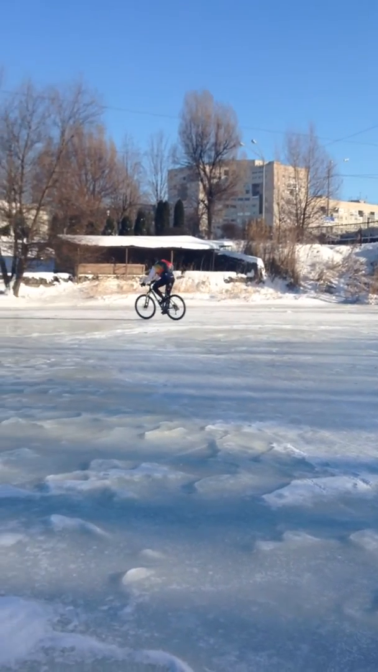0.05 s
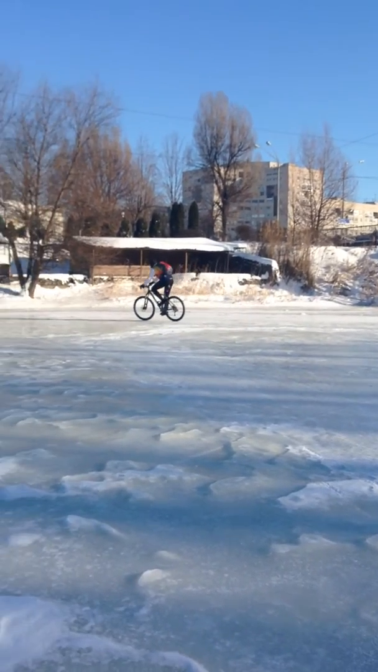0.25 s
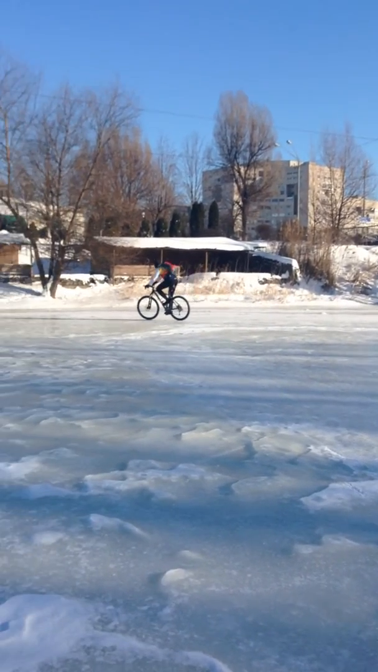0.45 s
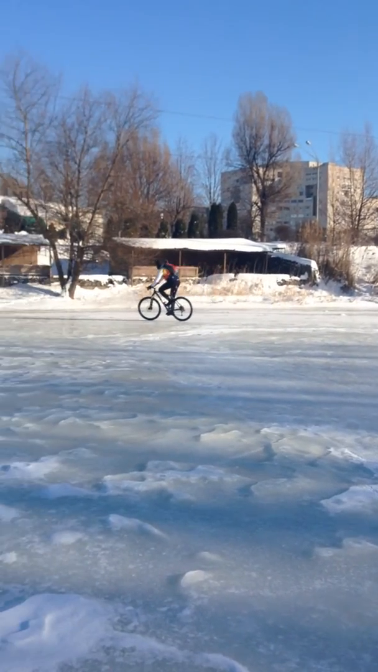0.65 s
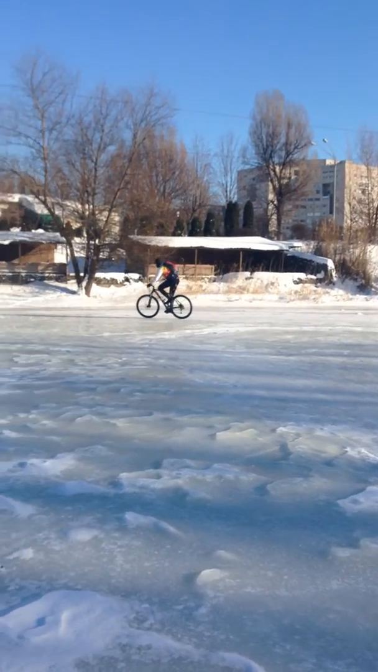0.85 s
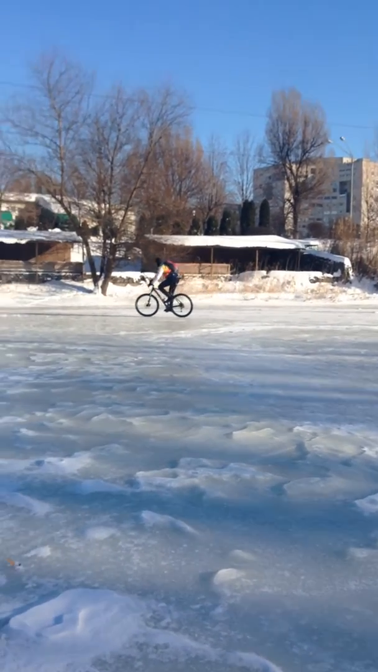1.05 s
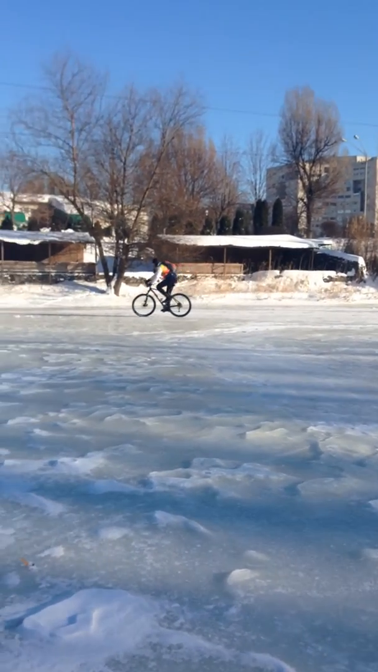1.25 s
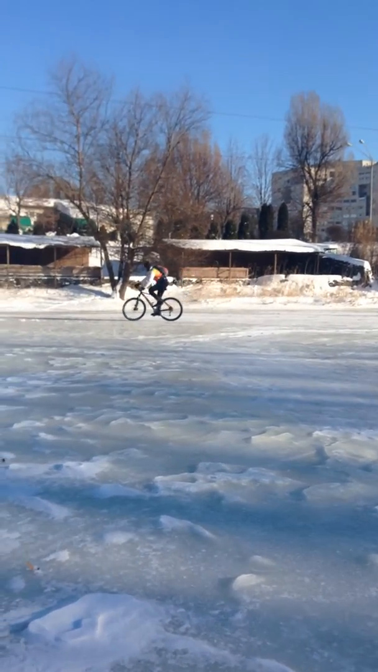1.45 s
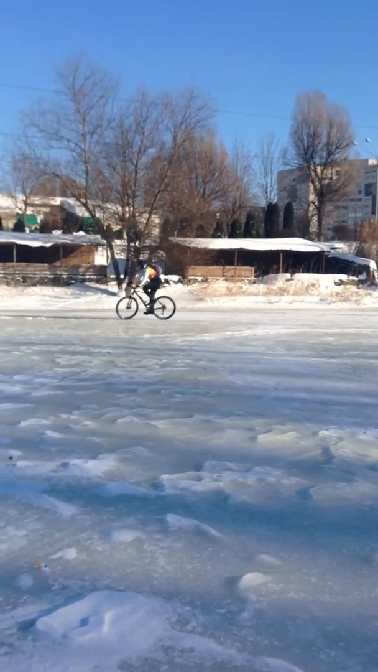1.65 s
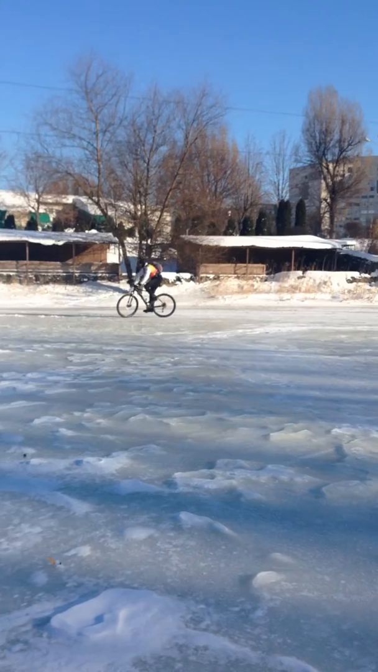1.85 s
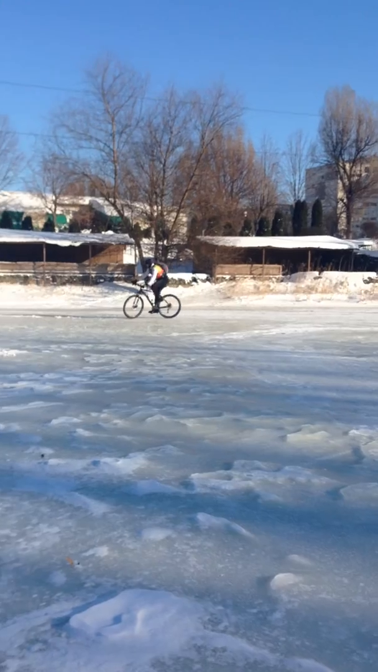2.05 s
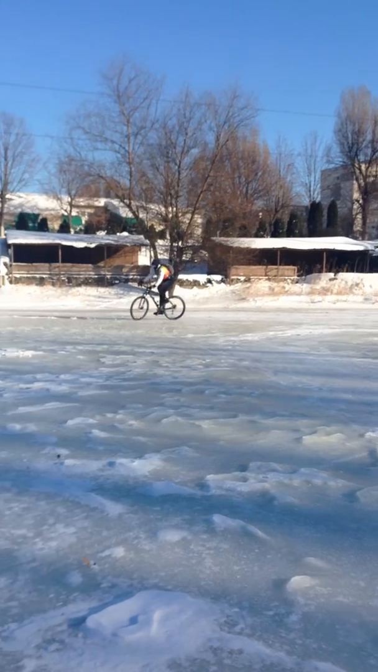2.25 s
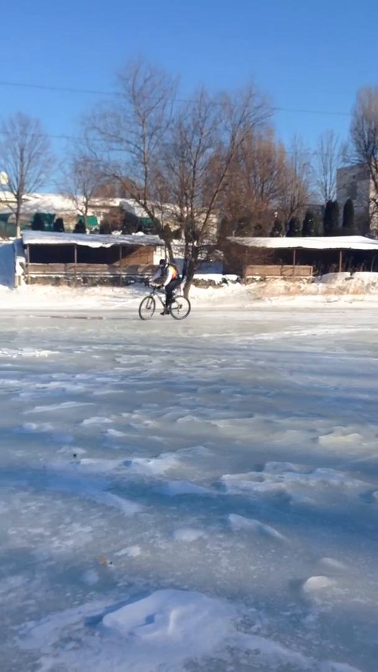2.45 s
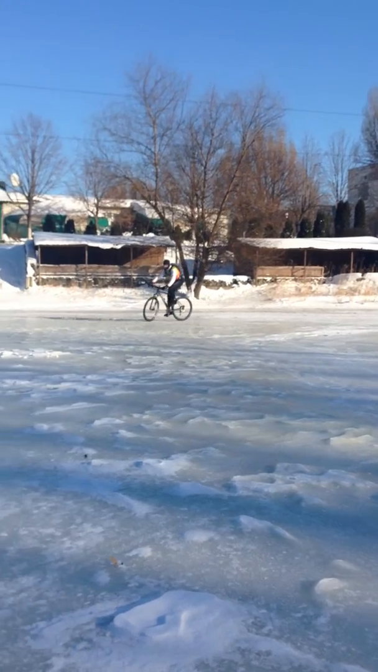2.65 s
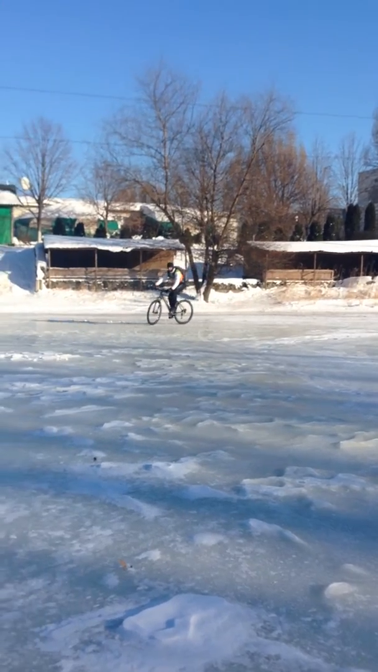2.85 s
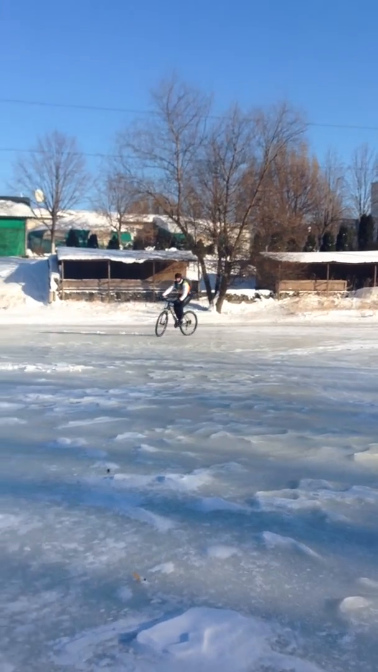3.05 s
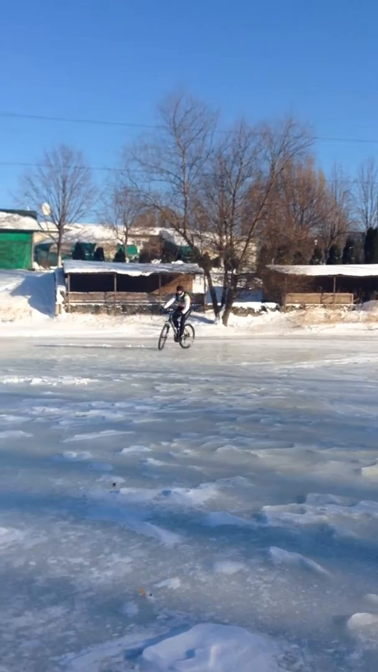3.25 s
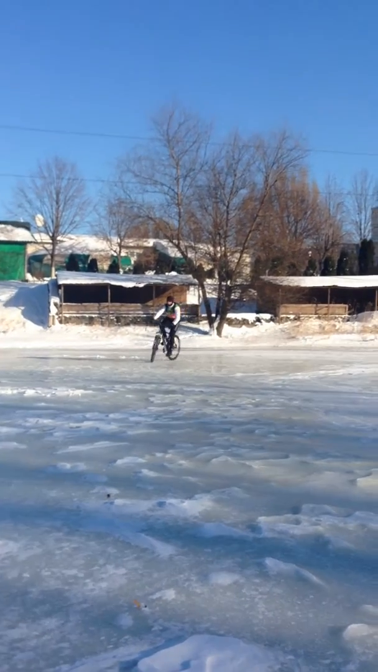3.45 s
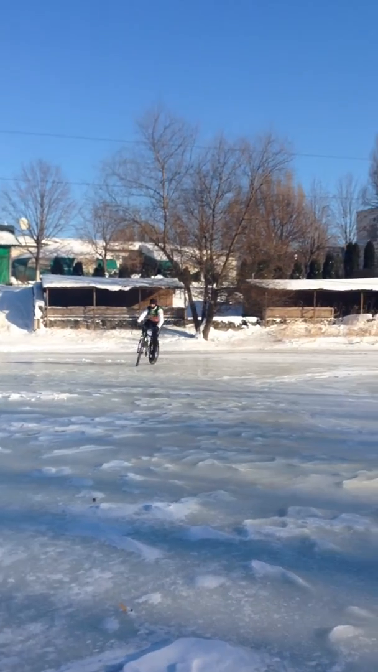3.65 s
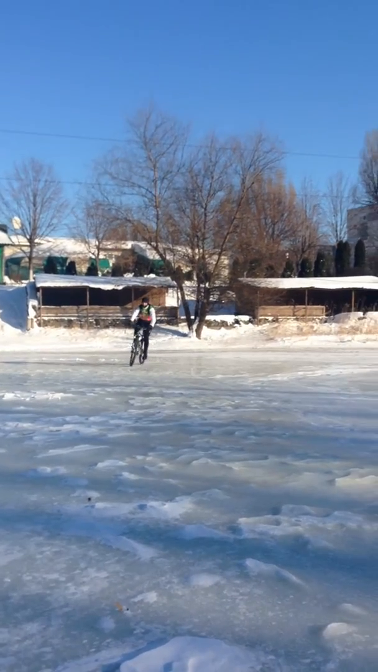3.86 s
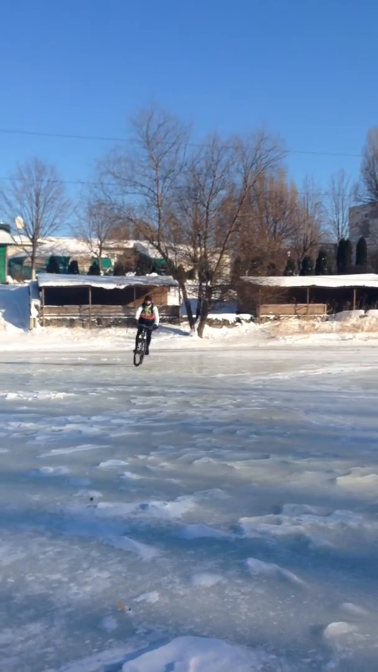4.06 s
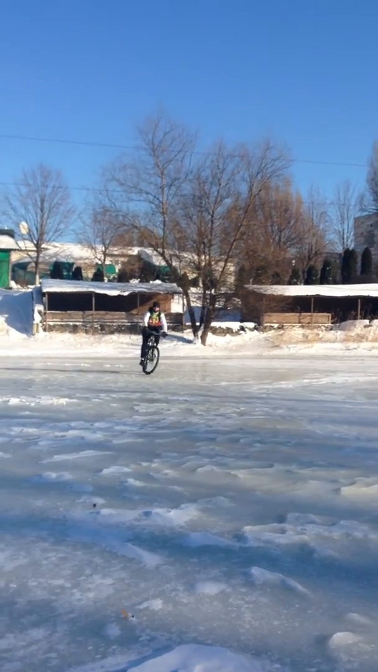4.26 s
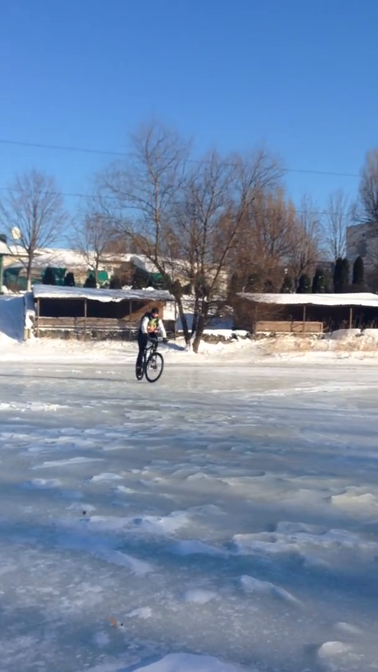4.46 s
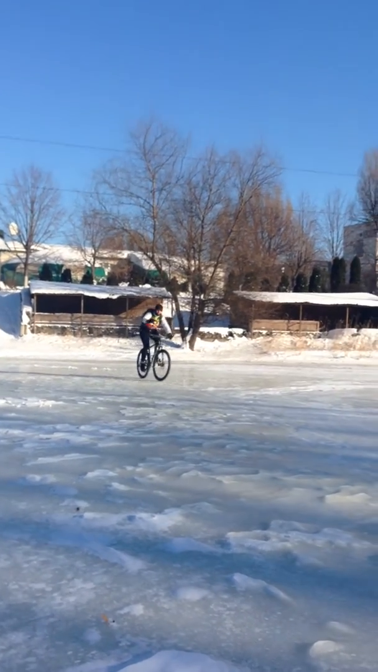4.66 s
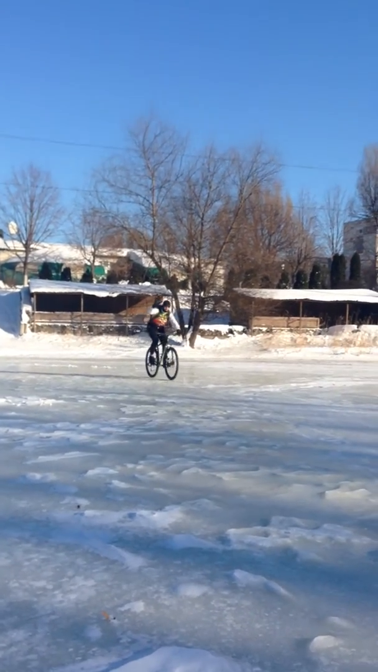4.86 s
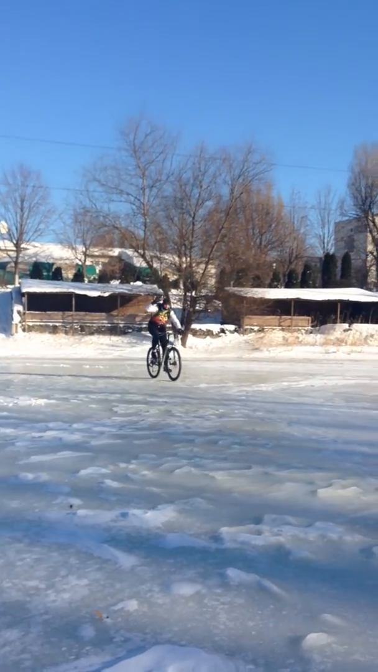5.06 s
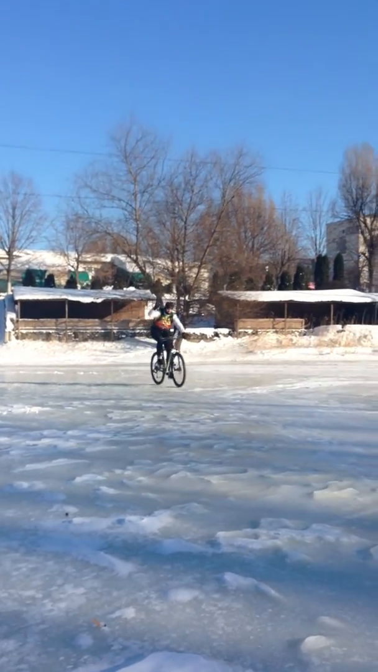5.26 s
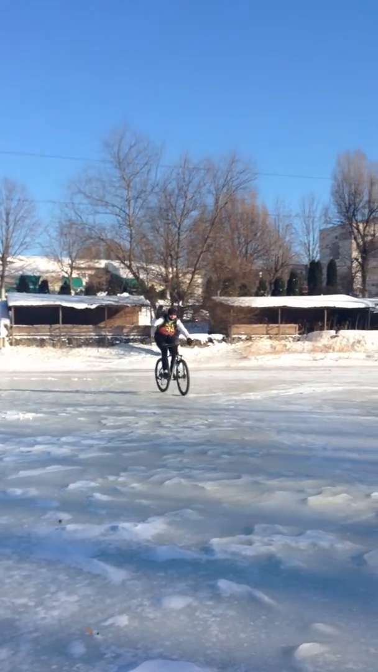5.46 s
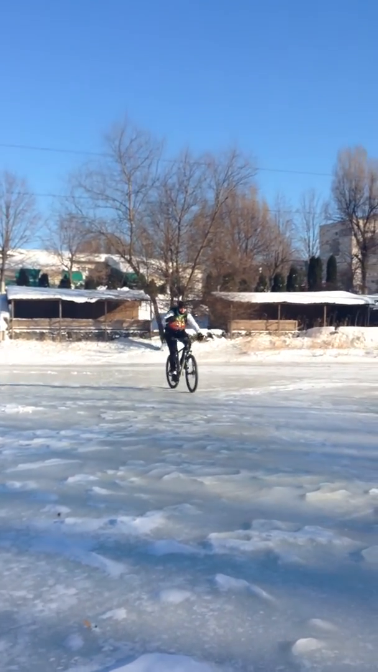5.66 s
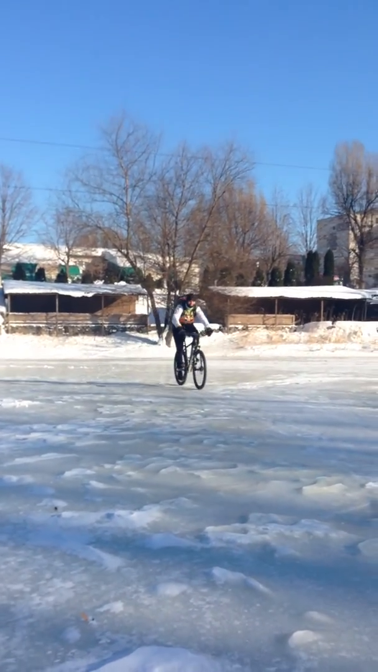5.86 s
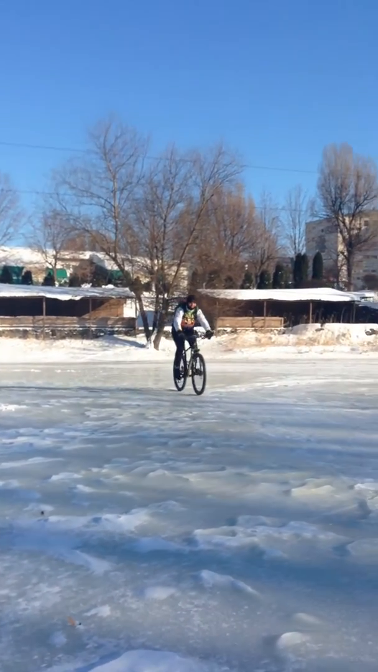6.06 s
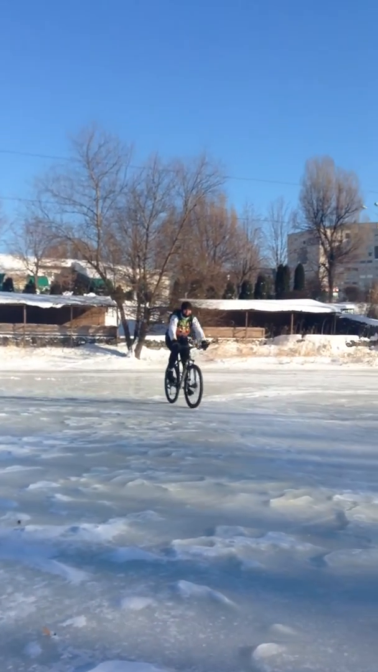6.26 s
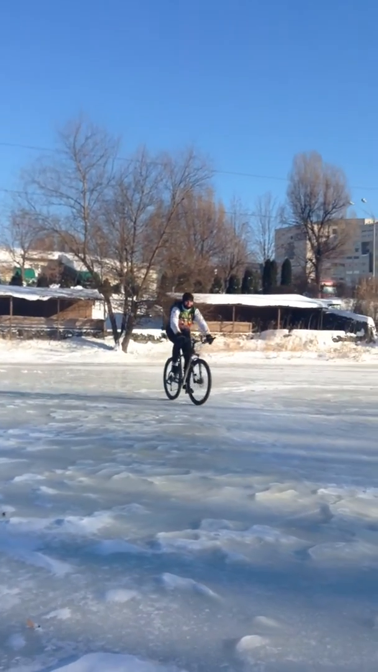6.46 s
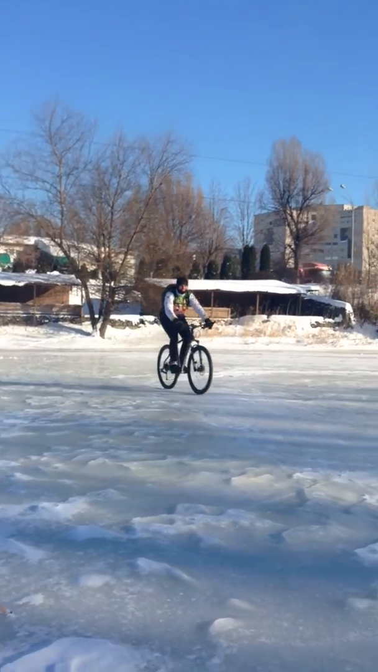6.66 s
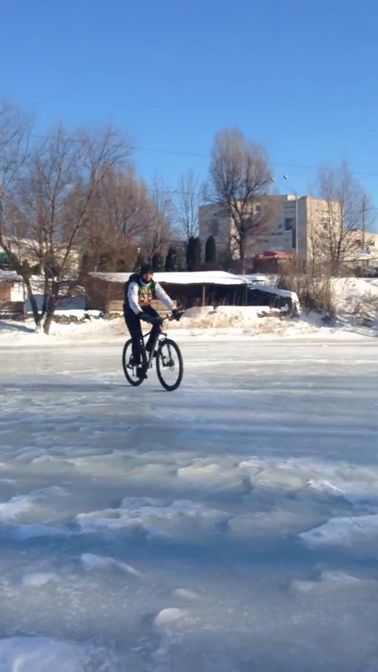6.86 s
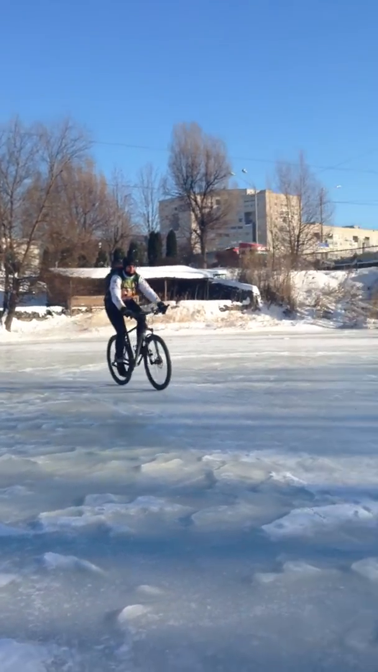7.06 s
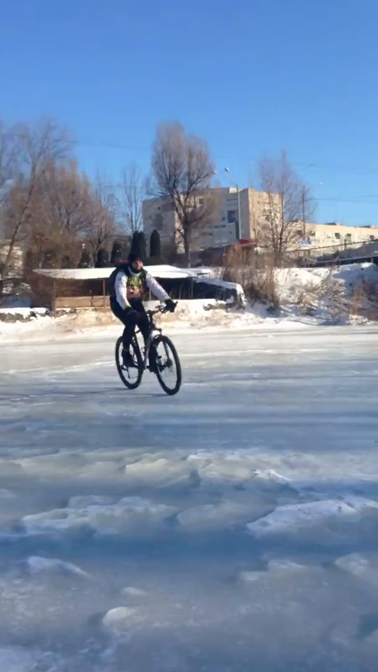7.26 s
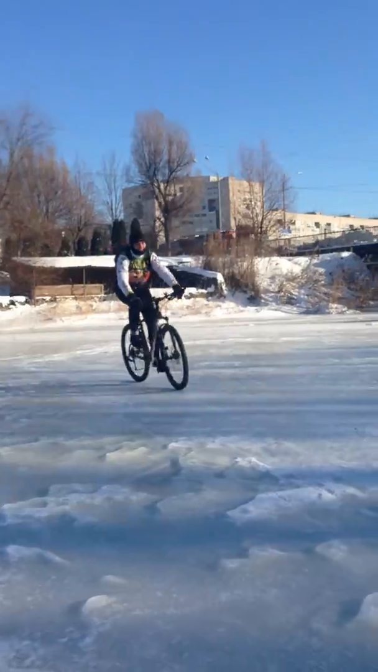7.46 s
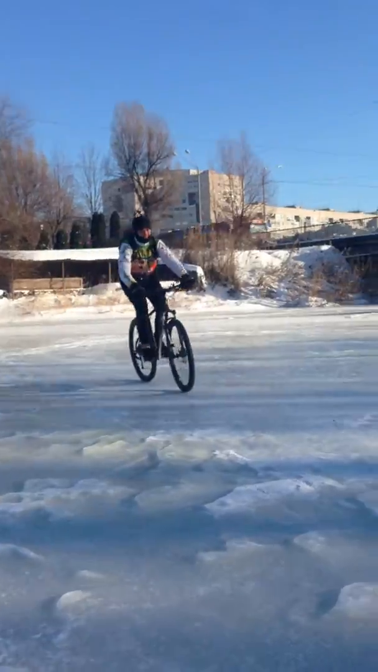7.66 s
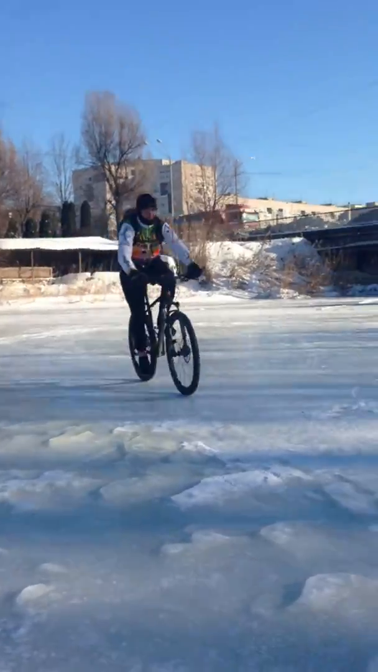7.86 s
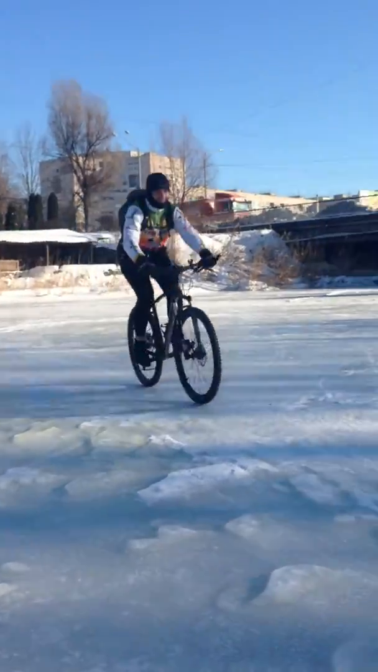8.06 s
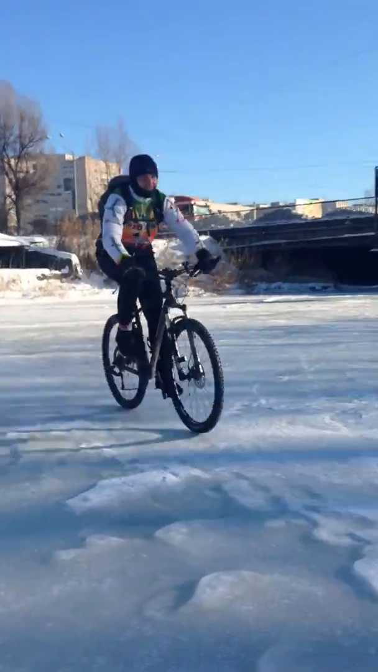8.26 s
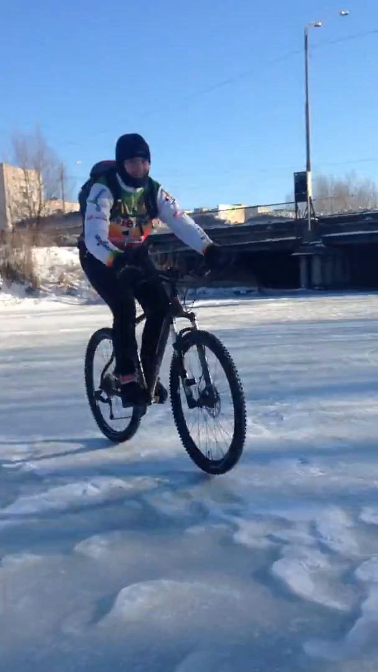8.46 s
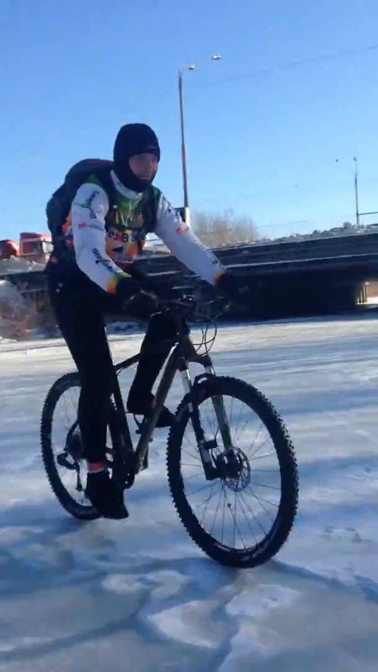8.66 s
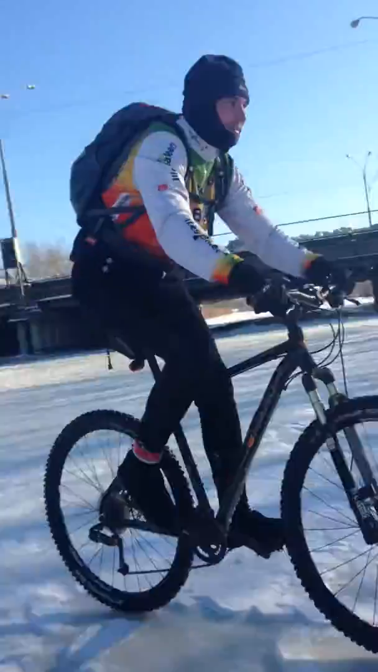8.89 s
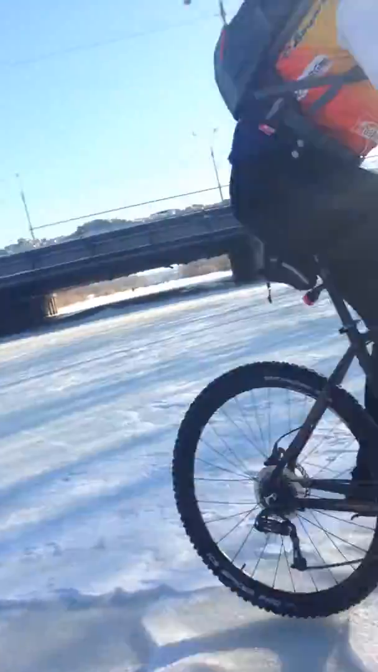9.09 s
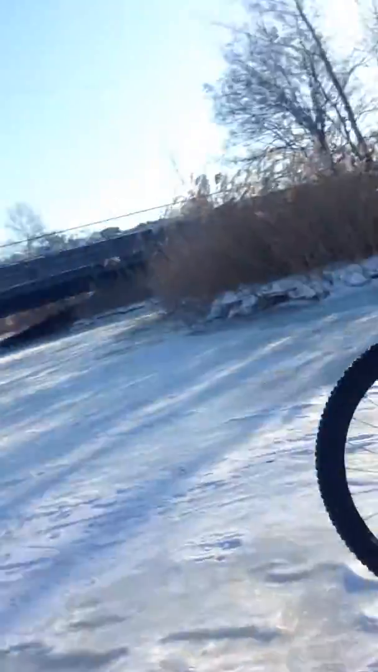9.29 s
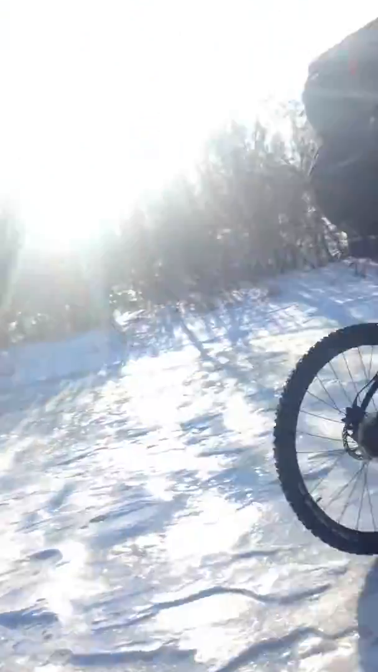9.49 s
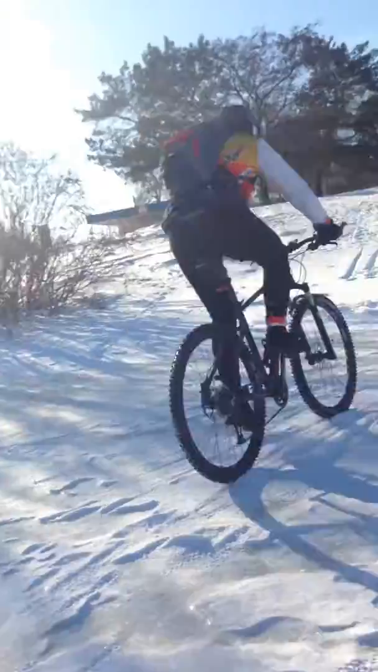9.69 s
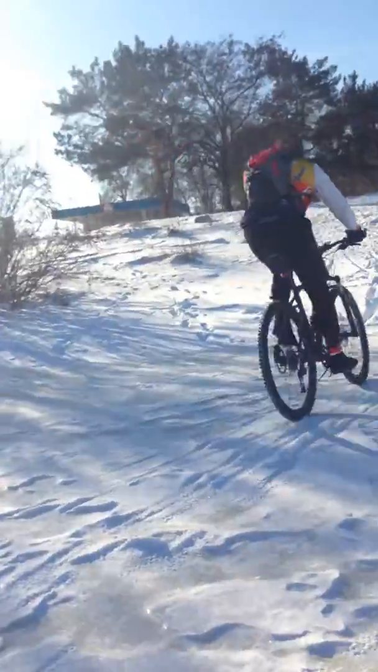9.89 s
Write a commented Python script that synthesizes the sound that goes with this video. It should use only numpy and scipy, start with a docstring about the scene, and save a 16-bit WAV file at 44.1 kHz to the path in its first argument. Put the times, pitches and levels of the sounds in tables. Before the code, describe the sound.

Studded bicycle tyres crackle faintly across ice, swell into a loud, crunching, snapping pass close by, then roll off onto packed snow.

```python
"""A town rumbles and a motor drones far off, while steel studs tick faintly across a frozen river.
A mountain bike on studded tyres draws near, passes close and rides onto packed snow.
Random fractures, filtered, make the stud bites, ringing casing, crust, frost and sizzling dust.
Decaying sines ring the ice chips and breaking plates; harmonics at the knob rate make the tread hum;
resonances of grains and noise make the skids and the brake disc brushing its pads."""
import sys
import numpy as np
from scipy import signal
from scipy.fft import rfft, irfft
from scipy.io import wavfile
from scipy.ndimage import uniform_filter1d

SR = 44100
rng = np.random.default_rng(int(sys.argv[2]) if len(sys.argv) > 2 else 0)


def transcribe(u):
    """Save the signal u as a 16-bit wav file named by the first command-line argument.

    u: samples, shape (n,) or (channels, n), limited to [-1, 1]; the rate is SR.
    q: integer samples, one column per channel.
    """
    v = np.clip(np.atleast_2d(u).T, -1, 1)
    q = np.round(v * 32767).astype(np.int16)
    wavfile.write(sys.argv[1], SR, q)


N = 437913
T = np.arange(N) / SR  # time_s of every sample

# the distant town's level: time_s, level_db
TOWN_LEVEL = [(0, -46.5), (1.9, -50.5), (3.1, -51.5), (5, -48), (8, -46), (9.93, -46)]
# the town's spectrum: freq_hz, relative_level_db
TOWN_COLOUR = [(20, -40), (35, -13), (57, 3), (100, -2), (140, -6.5), (260, -10), (370, -19.5),
               (850, -18.5), (1400, -21), (2500, -24.5), (3200, -32.5), (5000, -35.5), (8000, -45.5),
               (16000, -49)]
# a far motor that drones and fades: pitch (Hz), level at the start (dB), fade (dB per s)
MOTOR_HZ, MOTOR_DB, MOTOR_FADE_DB_PER_S = 68.5, -50.5, 3

# the bike's path: time_s, distance_m
PATH = [(0, 38), (1.3, 33.6), (2.3, 24.9), (3.6, 20.8), (4.7, 13.5), (6.2, 12.5), (7.4, 6.53), (8.3, 3.5),
        (8.6, 2.5), (9.1, 1.52), (9.5, 2.05), (9.93, 4.8)]
# the bike turns to face the listener, then draws alongside: start (s), length (s)
TURN_S, TURN_LENGTH_S = 2.66, 0.65
ALONGSIDE_S, ALONGSIDE_LENGTH_S = 8.52, 0.39
# the tyres leave the ice for packed snow: start (s), length (s), change of studs and casing (dB)
SNOW_S, SNOW_LENGTH_S, SNOW_STUD_DB, SNOW_CASING_DB = 9.57, 0.035, -12.5, 0.5
# levels at 1 m on ordinary ice, before the loss per metre: studs, casing, dust, faint stray ticks (dB)
STUD_DB, CASING_DB, DUST_DB, STRAY_DB = -26.5, -29.5, -43.5, -43
# extra loss on the way over the ice: studs, dust (dB per m)
STUD_LOSS_DB_PER_M, DUST_LOSS_DB_PER_M = 0.0671, 0.16

# snow dust's spectrum: freq_hz, relative_level_db
POWDER_COLOUR = [(2000, -0.5), (6000, 2.5), (9500, -0.5), (13000, -2), (16000, -6)]
# the spray behind the rear wheel comes round: start (s), length (s), extra dust (dB)
SPRAY_S, SPRAY_LENGTH_S, SPRAY_DB = 8.3, 1, 3.5
# the dust is a long trail, so it fades more slowly than a point source: share of the spreading loss
TRAIL_SHARE = 0.79

# fizz of frosted ice: freq_hz, relative_level_db
FROST_COLOUR = [(1600, -12), (2200, -5), (3300, 2), (5600, -6), (7000, -12), (9500, -38)]
# frosted ice on the way in: start (s), length (s), level at 1 m (dB)
FROST_S, FROST_LENGTH_S, FROST_DB = 7.795, .69, -34.5

# the brake disc brushing its pads: start_s, length_s, ring_level_db
RUBS = [(4.637, 0.017, -58), (4.662, 0.015, -52.5), (4.68, 0.94, -67), (5.757, 0.015, -54),
        (7.273, 0.034, -54)]
# modes of the steel disc: freq_hz, width_hz, relative_level_db
DISC_MODES = [(6500, 200, -3), (8400, 330, 0), (10560, 150, 4.5), (12300, 210, 3), (13050, 300, -4),
              (15150, 200, -4)]
# hiss of the pads: centre (Hz), width (Hz), level against the disc's ring (dB)
PAD_HISS_HZ, PAD_HISS_WIDTH_HZ, PAD_HISS_DB = 10500, 5000, -2

# tread knobs meeting the ice: time_s, knob_rate_hz, hum_level_db
TREAD = [(3.5, 50, -64), (3.8, 51.9, -50), (4.15, 50.97, -50), (4.7, 53.05, -41.5), (6.1, 58.66, -44.5),
         (7.7, 65.3, -41.5), (8.5, 63.7, -43), (8.9, 59.5, -72)]

# patches of crust crushed under a wheel: start_s, length_s, body_level_db, splinter_level_db
CRUNCHES = [(2.848, 0.081, -60, -57.5), (3.405, 0.05, -54, -78), (3.642, 0.05, -50.5, -72),
            (3.69, 0.26, -64, -60), (6.02, 0.094, -53, -52.5), (6.332, 0.081, -47, -53),
            (6.457, 0.065, -45.5, -48), (6.639, 0.071, -44, -55), (6.753, 0.085, -43, -48),
            (8.695, 0.039, -30.5, -27), (8.878, 0.065, -26.5, -38), (8.989, 0.0383, -32, -55),
            (9.233, 0.005, -17, -31), (9.58, 0.039, -34, -44), (9.306, 0.081, -42, -40),
            (9.655, 0.016, -36, -39), (9.687, 0.04, -36, -46), (9.825, 0.014, -34, -62)]
# breaking plates: start_s, peak_db, pitch_hz, cycles_to_full_swing, crumbs_against_knock_db, edge_peak_db
CRACKS = [(3.4325, -38.5, 675, 0.78, -10, -53), (3.6663, -34, 1300, .4, -6, -55),
          (6.0217, -33, 743, 0.75, -8, -44), (6.3325, -32, 740, .7, -7, -32),
          (6.36, -28, 745, 0.75, -4, -31), (6.6773, -25.5, 736, 0.44, -4, -30),
          (6.689, -30.5, 740, .5, -1, -34), (6.8461, -21.5, 1200, 0.39, -13, -24.5),
          (8.6973, -12, 472, 0.22, -3, -11), (8.7021, -14, 1115, 0.48, -9, -22),
          (8.7112, -13.5, 1180, 0.5, -5, -6.5), (8.7203, -15.5, 2180, 0.98, -5, -4.5),
          (8.8804, -9, 526, 0.3, -8, -4), (8.8836, -22, 606, .37, -11, -18),
          (8.8876, -21, 900, 0.62, -12, -26), (8.91, -15, 910, 0.35, -10, -32),
          (8.9225, -30, 340, 0.43, -10, -40), (8.9283, -17.5, 645, 0.5, -14, -34),
          (9.011, -14, 630, 0.38, -11, -18), (9.2341, -12.5, 800, 0.46, 2, -20),
          (9.5815, -23, 1250, 1, -9, -34), (9.5852, -18.5, 650, 0.32, -2, -22),
          (9.5975, -26.5, 620, 0.57, -9, -45), (9.6895, -31, 1150, 1, -13, -48),
          (9.707, -24, 1200, .6, -7, -30), (9.7178, -20, 780, 0.88, -7, -46),
          (9.7504, -24, 1200, 0.35, 0, -40), (9.7848, -30, 1240, 1.1, -14, -55),
          (9.8145, -32, 790, .9, -14, -55), (9.8228, -25, 1350, 1.8, -12, -52),
          (9.827, -23.5, 760, 0.58, -3, -48), (9.8612, -20, 640, 0.74, -21, -46),
          (9.8992, -25, 810, 0.64, -3, -46), (9.914, -23, 930, .7, -8, -52)]
# dull grains of crust, by spectrum: freq_hz, relative_level_db
CRUST_COLOUR = [(80, -27.5), (190, 2.5), (320, 7), (480, 4.5), (700, 4.5), (1500, 0.5), (2100, -3),
                (3000, -9), (6000, -41), (15000, -29)]
# bright splinters, by spectrum: freq_hz, relative_level_db
SPLINTER_COLOUR = [(1000, -9), (3000, 9), (4600, 7), (5800, 6), (7500, 4), (9500, 0.5), (13500, 1),
                   (16000, 0.5)]
# the microphone's resonance on sharp cracks: pitch (Hz), cycles to full swing, level against the tick (dB)
MIC_RING_HZ, MIC_RING_CYCLES, MIC_RING_DB = 5820, 1.5, -6

# studs skidding: start_s, length_s, pitch_hz, level_db
SKIDS = [(5.315, 0.015, 3180, -44), (5.479, 0.032, 2300, -54), (5.62, 0.081, 1130, -52),
         (5.85, 0.04, 2450, -49), (7.422, 0.24, 1122, -50), (8.414, 0.037, 3230, -34.5),
         (8.797, .014, 2350, -27), (8.861, 0.02, 3180, -25.5), (9.043, 0.044, 2920, -27),
         (9.138, 0.028, 3270, -26.5), (9.291, .015, 2930, -26.5), (9.361, 0.021, 1650, -29.5),
         (9.502, .014, 1770, -28), (9.542, 0.021, 2690, -27)]
SKID_WIDTH = 0.4  # width of a skid's rasp as a share of its pitch

# single studs that snap off the ice: start_s, peak_db, chip_pitch_hz, ring_against_tick_db
SNAPS = [(.6933, -34, 2980, -5), (1.0207, -36, 2400, -2), (1.0323, -33.5, 2400, -1),
         (1.1434, -34, 3000, -17), (1.692, -37, 3000, -16), (1.7897, -32.5, 3480, -24),
         (1.8689, -37, 2980, -12), (1.8995, -34, 2980, -12), (2.023, -31, 4200, -13),
         (2.093, -36, 3000, -10), (2.1135, -33, 3600, -8), (2.143, -36, 2300, -2), (2.147, -35, 4200, -10),
         (2.172, -43, 4800, -6), (2.2323, -34, 4000, -6), (2.2464, -36, 4400, -2), (2.327, -33, 3300, 0),
         (2.355, -37, 3300, -4), (2.4364, -35, 4200, -8), (2.479, -33.5, 2500, -8), (2.565, -33, 4700, -4),
         (2.6279, -34, 4400, -6), (2.6577, -31, 3860, -3), (2.678, -38, 3400, -8), (2.743, -31, 3200, -19),
         (2.8113, -33, 3000, -8), (2.8312, -32, 2600, -10), (3.0188, -32, 2800, -12),
         (3.4595, -33, 2700, -2), (3.9257, -28, 3000, -19), (4.488, -30, 3000, -7),
         (4.6272, -27.5, 3000, -7), (5.3195, -23.5, 3200, -8), (5.354, -30, 3300, -5),
         (5.6972, -28, 2400, -12), (6.1689, -22.5, 3000, -10), (6.383, -25, 3200, -5),
         (6.405, -23, 2600, -12), (7.9146, -21.5, 2900, -6), (7.939, -26, 1850, 6), (8.0292, -21, 3500, -2),
         (8.2083, -25, 2130, 4), (8.2585, -19, 2600, -1), (8.3412, -15, 3230, 6), (8.423, -17, 3200, -3),
         (8.454, -17, 3030, -11), (8.502, -11, 1390, -8), (8.8014, -15.5, 2280, 0), (8.8503, -12, 2890, -4),
         (8.871, -9, 3390, -3), (8.8758, -10, 3300, 0), (8.9895, -14, 2160, 2), (9.0012, -16, 3280, -5),
         (9.054, -12, 2730, 0), (9.067, -9, 3140, -1), (9.1277, -18, 2230, -1), (9.1525, -9, 3200, 5),
         (9.187, -8, 2680, -7), (9.198, -15, 2200, -10), (9.2132, -9, 1510, -6), (9.2994, -10, 3070, 2),
         (9.3655, -17, 2900, -2), (9.401, -14, 3830, 1), (9.4165, -18, 3400, 0), (9.47, -7, 3220, 6),
         (9.479, -16, 2800, -3), (9.5443, -12, 2660, 2), (9.5504, -11, 2650, 0), (9.5664, -15, 2840, 5)]
# ice chips: typical pitch (Hz), its spread (octaves), cycles to full swing, drift from patch to patch (octaves)
CHIP_HZ, CHIP_SPREAD_OCTAVES, CHIP_CYCLES = 3030, 0.29, 0.72
CHIP_DRIFT_OCTAVES = 0.14

# stud bites heard from far off: freq_hz, relative_level_db
STUD_FAR_COLOUR = [(300, -22), (900, -5.5), (1400, -5), (1720, -2), (2050, 3), (2400, 2), (2750, -1),
                   (3300, -3), (4300, -6), (5200, -8.5), (6300, -14), (9000, -25.5), (15000, -40)]
# stud bites heard close by or on rough ice: freq_hz, relative_level_db
STUD_CLOSE_COLOUR = [(300, -25.5), (900, -3.5), (1400, 1.5), (1900, 1), (2700, 0.5), (3300, 1), (4000, -2),
                     (4900, -7.5), (5900, -9.5), (7500, -13.5), (10000, -24.5), (15000, -22.5)]
# the hollow tyre casing: freq_hz, relative_level_db
CASING_COLOUR = [(70, -10.5), (190, 1.5), (280, -1), (460, -0.5), (590, 0), (705, 3), (850, 2), (1050, 2),
                 (1400, -0.5), (1750, -3), (2600, -8.5), (6000, -33)]
# patches of rough ice where studs bite harder, or smooth ice (negative): middle_s, length_s, peak_gain_db
RIDGES = [(0.72, 0.1, 7), (1.023, 0.081, 5), (1.55, 0.43, 3), (2.25, 0.79, 2.5), (4.703, 0.36, 3),
          (5.34, .06, 4), (5.498, 0.075, 6), (5.734, 0.4, 2.5), (5.97, 0.13, 0.5), (6.2, 0.59, 4.5),
          (6.397, 0.046, 7), (7.398, 1.34, -3.5), (8.39, 0.24, 3), (8.684, 0.12, 7), (8.76, 0.053, 3.5),
          (8.806, 0.08, 6), (8.864, 0.1, 6.5), (8.93, .09, -1.5), (9.055, 0.17, 3.5), (8.996, 0.051, 7),
          (9.115, 0.035, 0), (9.19, 0.088, 8), (9.265, 0.045, -1.5), (9.307, 0.034, 4), (9.358, 0.039, 2),
          (9.432, 0.058, -8), (9.468, 0.055, 7.5), (9.528, 0.025, -6), (9.557, 0.07, 5)]
# audible stud bites per s: far off, and those added close by
FAR_BITES_PER_S, NEAR_BITES_PER_S = 105, 380
# rough ice gives a brighter bite: share of the close colour per dB of extra bite
BRIGHTEN_PER_DB = 0.07
# the ice's unevenness: spots per s, one spread throughout (dB)
SPOTS_PER_S, SPOT_SPREAD_DB = 35, 1.0
# the wedge between tyre and ice throws the casing's sound fore and aft: change before the turn, alongside (dB)
ACROSS_DB, ALONGSIDE_DB = -4, -1
# the air in the tyre rings: pitch (Hz), width (Hz), level against the casing (dB)
CAVITY_HZ, CAVITY_WIDTH_HZ, CAVITY_DB = 712, 55, -12.5
# thicker flakes: typical pitch (Hz), spread (octaves), level against the casing (dB)
FLAKE_HZ, FLAKE_SPREAD_OCTAVES, FLAKE_DB = 1200, 0.47, -8
# the colour of the roll wanders with the ice: changes per s, depth (dB)
WANDER_PER_S, WANDER_DB = 22, 1.3

TOP_HZ = 15450  # upper edge of the finished sound


def undb(db):
    """Decibels to gain."""
    return 10 ** (np.asarray(db) / 20)


def curves(rows):
    """Each column of a table joined by straight lines in time."""
    s, *columns = np.transpose(rows)
    return [np.interp(T, s, c) for c in columns]


def ramp(start, length):
    """0 before a change, 1 after it."""
    return np.clip((T - start) / length, 0, 1)


def gate(start, length, db):
    """A soft-edged stretch of contact."""
    edge_s = 0.0016
    full_until = start + max(length - edge_s, edge_s)
    corners = [start - edge_s, start + edge_s, full_until, start + length + edge_s]
    return undb(db) * np.interp(T, corners, [0, 1, 1, 0])


def add(out, start, sound):
    """Mix a short sound in at a time."""
    i = max(int(start * SR), 0)
    out[i:i + len(sound)] += sound[:max(N - i, 0)]


def unit(x):
    """Scale to rms 1."""
    return x / np.sqrt(np.mean(x ** 2))


def walk(rate):
    """Slow chance at rms 1: random levels held 1 / rate s and slewed twice."""
    k = int(SR / rate)
    steps = np.repeat(rng.standard_normal(N // k + 1), k)
    return unit(uniform_filter1d(uniform_filter1d(steps, k), k)[:N])


def colour(x, points):
    """Causal minimum-phase filter through (Hz, dB) points."""
    size = 8192
    hz, db = np.transpose(points)
    bins = np.maximum(np.fft.rfftfreq(size, 1 / SR), 1)
    gain = undb(np.interp(np.log(bins), np.log(hz), db))
    # folding the cepstrum forwards in time gives minimum phase
    cepstrum = irfft(np.log(gain))
    cepstrum[1:size // 2] *= 2
    cepstrum[size // 2 + 1:] = 0
    response = irfft(np.exp(rfft(cepstrum)))
    return signal.fftconvolve(x, response / np.linalg.norm(response))[:len(x)]


def resonate(x, hz, width):
    """One resonance, gain 1 at its centre."""
    return signal.lfilter(*signal.iirpeak(hz, hz / width, fs=SR), x)


def crackle(rate, spread_db, decay_s, tick=0):
    """Tiny uneven fractures: a sharp tick, then a fast-dying burst; even in level over longer stretches."""
    hits = np.zeros(N)
    when = np.flatnonzero(rng.random(N) < rate / SR)
    hits[when] = undb(spread_db * np.clip(rng.standard_normal(len(when)), -2.5, 2.2))
    energy = signal.lfilter([1], [1, -np.exp(-1 / (decay_s * SR))], hits ** 2) + 1e-9
    sound = np.sqrt(energy) * rng.standard_normal(N) - tick * hits
    return sound / np.sqrt(uniform_filter1d(sound ** 2, size=5000) + 1e-9)


def burst(decay_s, points, tick=0):
    """One fracture: a tick and a coloured burst, peak 1."""
    t = T[:1024]
    noise = rng.standard_normal(len(t)) * np.exp(-t / decay_s)
    sound = colour(noise - tick * (t == 0), points)
    return sound / np.abs(sound).max()


def knock(hz, cycles):
    """A struck resonance swings up and rings for a few cycles; its envelope peaks at 1."""
    turns = hz * T[:1024]
    bend = turns / cycles
    return np.sin(2 * np.pi * turns) * bend * np.exp(1 - bend)


def chips(rate, spread_db, hz, spread_octaves):
    """Chips flake off under the studs, each at its own pitch, which drifts with the thickness of the ice."""
    out = np.zeros(N)
    octaves = CHIP_DRIFT_OCTAVES * walk(28) + spread_octaves * rng.standard_normal(N)
    size = np.clip(rng.standard_normal(N), -2, 2)
    for i in np.flatnonzero(rng.random(N) < rate / SR):
        add(out, T[i], undb(spread_db * size[i]) * knock(hz * 2 ** octaves[i], CHIP_CYCLES))
    return unit(out)


def spreading_db():
    """Sound weakens as 1 / distance."""
    metres, = curves(PATH)
    return -20 * np.log10(metres)


def ridges_db():
    """The bite changes smoothly across each patch of ice."""
    out = np.zeros(N)
    for s, length, db in RIDGES:
        add(out, s - length / 2, db * np.hanning(int(length * SR)))
    return out


def wander(x):
    """Each part of the spectrum swells and sinks on its own."""
    for hz in np.geomspace(600, 4800, 7):
        swell = undb(WANDER_DB * walk(WANDER_PER_S)) - 1
        x = x + swell * resonate(x, hz, hz / 3)
    return x


def town():
    """Far traffic is coloured noise that wavers slowly, with one motor's two harmonics fading in it."""
    db, = curves(TOWN_LEVEL)
    traffic = unit(colour(rng.standard_normal(N), TOWN_COLOUR)) * undb(db + .5 * walk(4.36))
    phase = 2 * np.pi * np.cumsum(MOTOR_HZ * (1 + 0.0081 * walk(8.3))) / SR
    motor = np.sin(phase) * undb(2.0 * walk(10.0)) + undb(-4.5) * np.sin(2 * phase)
    motor_db = MOTOR_DB - MOTOR_FADE_DB_PER_S * T + 2.6 * walk(5.4)
    return traffic + unit(motor) * undb(motor_db)


def dust():
    """Snow dust sizzles off the tread, thrown mostly backwards; now and then a larger chip ticks."""
    metres, = curves(PATH)
    db = DUST_DB + TRAIL_SHARE * spreading_db() - DUST_LOSS_DB_PER_M * metres
    db = db + SPRAY_DB * ramp(SPRAY_S, SPRAY_LENGTH_S)
    sizzle = crackle(1500, spread_db=1.5, decay_s=0.002, tick=4.1)
    larger = crackle(27, spread_db=0, decay_s=0.0015, tick=3)
    return unit(colour(sizzle + undb(-7.5) * larger, POWDER_COLOUR)) * undb(db)


def frost():
    """A stretch of frosted ice fizzes brightly under the studs in dense, very uneven fractures."""
    fizz = unit(colour(crackle(1800, spread_db=9.0, decay_s=0.00028, tick=4.5), FROST_COLOUR))
    return fizz * gate(FROST_S, FROST_LENGTH_S, FROST_DB) * undb(TRAIL_SHARE * spreading_db())


def brake():
    """Pads catch the steel disc in fits and starts; each mode flares on its own over the dry hiss of rubbing."""
    ring = 0
    for hz, width, db in DISC_MODES:
        catches = crackle(260, spread_db=4, decay_s=.002)
        ring = ring + undb(db + 5 * walk(28)) * resonate(catches, hz, width)
    hiss = resonate(rng.standard_normal(N), PAD_HISS_HZ, PAD_HISS_WIDTH_HZ)
    contact = sum(gate(*row) for row in RUBS)
    return (unit(ring) + undb(PAD_HISS_DB) * unit(hiss)) * contact


def tread():
    """Evenly spaced knobs give a low, nearly pure hum that follows the speed."""
    hz, db = curves(TREAD)
    phase = 2 * np.pi * np.cumsum(hz) / SR
    hum = np.sin(phase)
    for harmonic, harmonic_db in [(2, -21.5), (3, -24), (4, -22.0)]:
        hum = hum + undb(harmonic_db) * np.sin(harmonic * phase)
    return unit(hum) * undb(db + .8 * walk(8.7))


def crust():
    """Crust crumbles into dull grains and bright splinters; whole plates break with a knock and a sharp edge."""
    body = sum(gate(s, length, db) for s, length, db, _ in CRUNCHES)
    edge = sum(gate(s, length, db) for s, length, _, db in CRUNCHES)
    grains = crackle(900, spread_db=3.0, decay_s=0.0002, tick=4)
    splinters = crackle(1500, spread_db=3.5, decay_s=0.00026, tick=2.0)
    out = body * unit(colour(grains, CRUST_COLOUR)) + edge * unit(colour(splinters, SPLINTER_COLOUR))
    for s, db, hz, cycles, crumb_db, edge_db in CRACKS:
        crumbs = undb(crumb_db) * burst(0.004, CRUST_COLOUR)
        add(out, s, undb(db) * (knock(hz, cycles) + crumbs))
        mic_ring = undb(MIC_RING_DB) * knock(MIC_RING_HZ, MIC_RING_CYCLES)
        split = burst(0.0012, SPLINTER_COLOUR, tick=2.2) - mic_ring
        add(out, s, undb(edge_db) * split / np.abs(split).max())
    return out


def skids():
    """A stud slips sideways and chatters, rasping at one pitch."""
    out = np.zeros(N)
    chatter = crackle(900, spread_db=4.5, decay_s=0.0004, tick=3.8)
    for s, length, hz, db in SKIDS:
        grains = chatter[int(s * SR):int((s + length) * SR)]
        rasp = resonate(resonate(grains, hz, SKID_WIDTH * hz), hz, SKID_WIDTH * hz)
        add(out, s, undb(db) * unit(rasp) * signal.windows.tukey(len(rasp), .5))
    return out


def snaps():
    """The sharpest stud bites: a steel tick and the ring of the chip it breaks off."""
    out = np.zeros(N)
    for s, db, hz, ring_db in SNAPS:
        tick = burst(.0007, STUD_CLOSE_COLOUR, tick=8)
        sound = tick - undb(ring_db) * knock(hz, CHIP_CYCLES)
        add(out, s, undb(db) * sound / np.abs(sound).max())
    return out


def tyres():
    """Studs bite and scrape and ring the hollow casing; bites are denser and brighter close by, weaker on snow."""
    metres, = curves(PATH)
    nearness = np.clip(1 + spreading_db() / 32, 0, 1)
    across = 1 - ramp(TURN_S, TURN_LENGTH_S)
    alongside = ramp(ALONGSIDE_S, ALONGSIDE_LENGTH_S)
    snow = ramp(SNOW_S, SNOW_LENGTH_S)
    rough_db = ridges_db()

    bite_rate = FAR_BITES_PER_S + NEAR_BITES_PER_S * nearness ** 2
    bites = crackle(bite_rate, spread_db=1.5, decay_s=0.00044, tick=4.5)
    scrape = crackle(3000, spread_db=-1.5, decay_s=0.0003)
    flex = crackle(600, spread_db=1.0, decay_s=0.003, tick=4.0)
    contact = bites + undb(-1.5 - 3.7 * across - 1.0 * alongside) * scrape

    far = unit(colour(contact, STUD_FAR_COLOUR))
    close = unit(colour(contact, STUD_CLOSE_COLOUR))
    close = close + undb(-7.5) * chips(260, 1.4, CHIP_HZ, CHIP_SPREAD_OCTAVES)
    # sparse, faint stray stud ticks beneath the main bites
    strays = unit(colour(crackle(60, spread_db=-1.5, decay_s=0.00022, tick=5.8), STUD_FAR_COLOUR))
    bright = np.clip(alongside + BRIGHTEN_PER_DB * rough_db, 0, 1)
    studs = (far * (1 - bright) + close * bright) * undb(STUD_DB) + strays * undb(STRAY_DB)
    studs = studs * undb(rough_db + SNOW_STUD_DB * snow - STUD_LOSS_DB_PER_M * metres)

    casing_db = CASING_DB + SNOW_CASING_DB * snow + ACROSS_DB * across + ALONGSIDE_DB * alongside
    shell = unit(colour(flex + undb(-2.0) * bites, CASING_COLOUR))
    cavity = undb(CAVITY_DB) * unit(resonate(scrape, CAVITY_HZ, CAVITY_WIDTH_HZ))
    flakes = undb(FLAKE_DB) * chips(170, 2.5, FLAKE_HZ, FLAKE_SPREAD_OCTAVES)
    casing = (shell + cavity + flakes) * undb(casing_db)

    spots_db = SPOT_SPREAD_DB * walk(SPOTS_PER_S)
    return wander(studs + casing) * undb(spreading_db() + spots_db)


def scene():
    """Open air: everything arrives directly."""
    background = town() + dust() + frost() + brake()
    bike = tread() + crust() + skids() + snaps() + tyres()
    return (background + bike)[None]


def record(dry):
    """Soft saturation rounds the tallest peaks and a steep low-pass cuts the top."""
    ceiling = .75
    rounded = ceiling * np.tanh(dry / ceiling)
    low_pass = signal.ellip(10, .2, 80, TOP_HZ, fs=SR, output="sos")
    return signal.sosfilt(low_pass, rounded)


dry = scene()
out = record(dry)
transcribe(out)
```